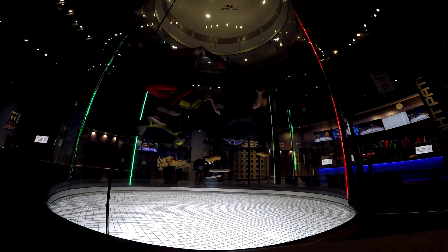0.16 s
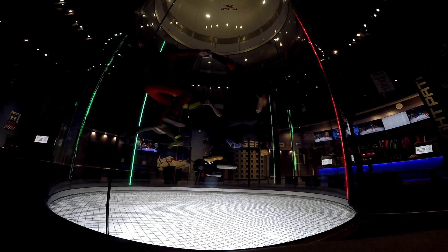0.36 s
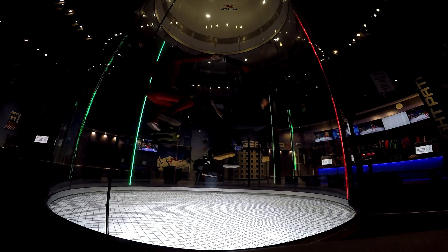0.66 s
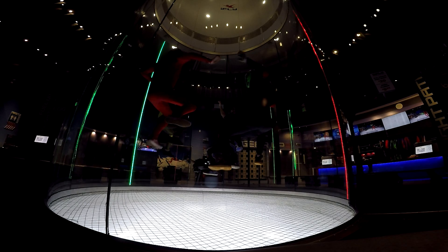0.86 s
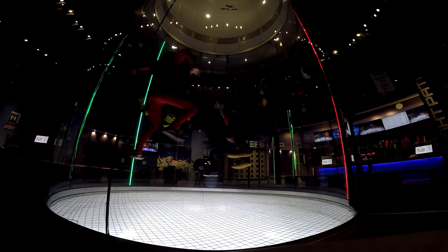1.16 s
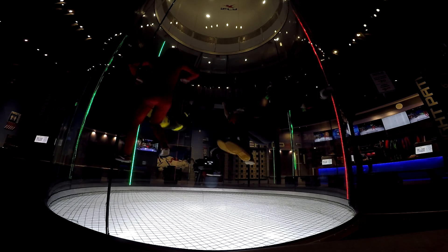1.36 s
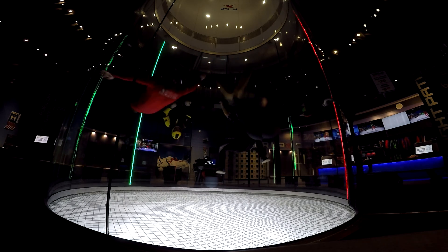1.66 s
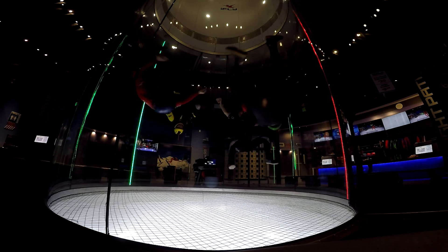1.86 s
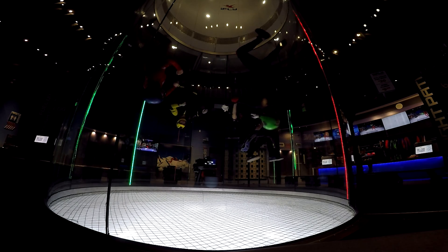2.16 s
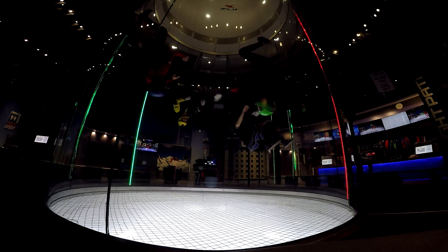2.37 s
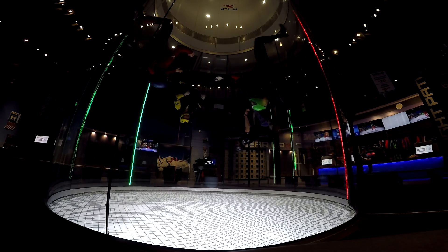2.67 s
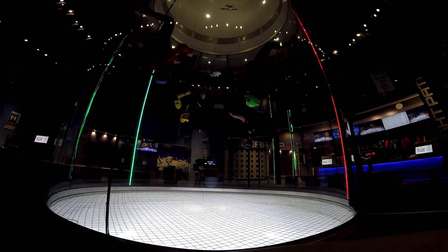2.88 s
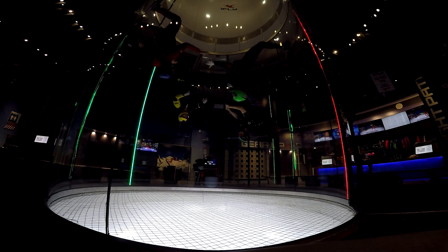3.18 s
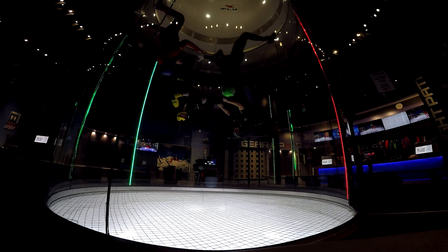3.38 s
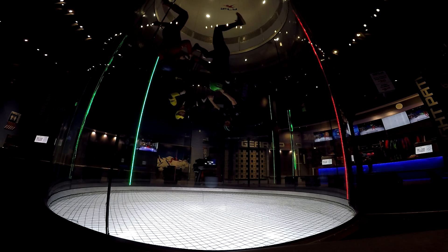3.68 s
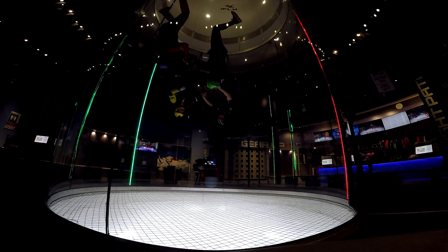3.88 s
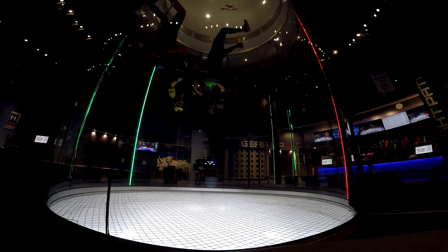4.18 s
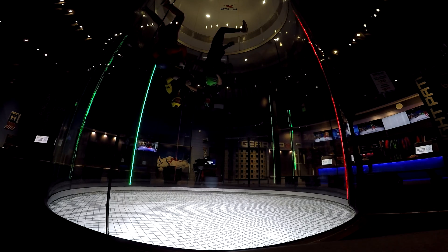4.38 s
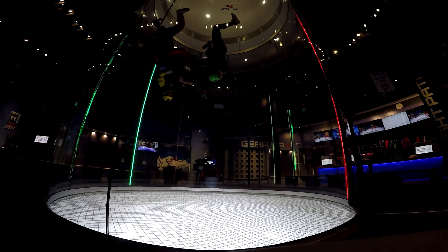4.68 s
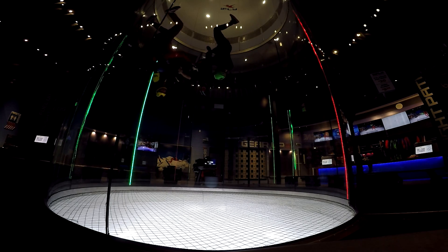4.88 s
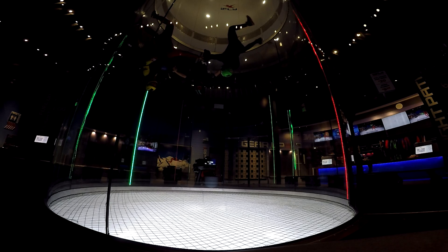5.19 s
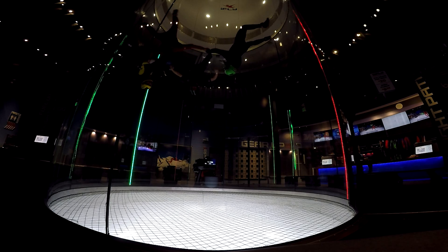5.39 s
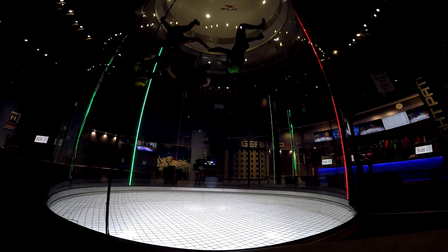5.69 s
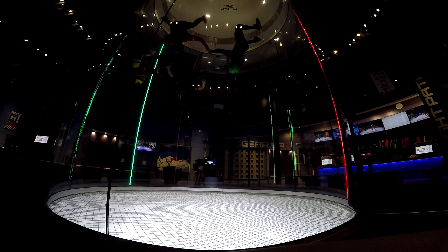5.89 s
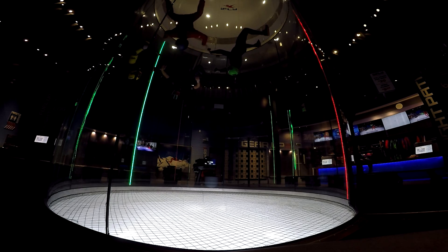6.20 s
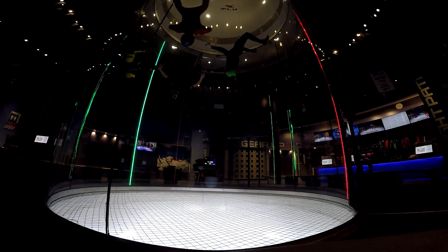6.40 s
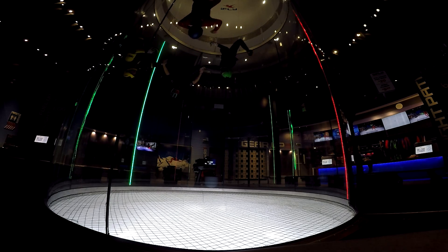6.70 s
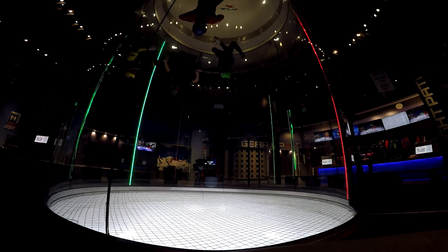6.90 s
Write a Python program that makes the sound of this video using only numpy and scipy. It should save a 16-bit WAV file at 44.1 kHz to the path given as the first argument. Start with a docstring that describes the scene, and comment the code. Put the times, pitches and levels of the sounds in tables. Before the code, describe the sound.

From the first moment to the end at about 7 seconds, a vertical wind tunnel gives a steady, loud rushing roar of air. The microphone sits inside a small housing beside the glass wall, so the roar is boxy and strongest in the low middle range. Beneath it the ducts rumble and throb deeply. Low humming tones swell and fade within the rumble, a little stronger around 1.5 seconds and again from about 5 to 7 seconds. Above the roar lie a thin, slightly gusting hiss and a faint high fan whine that wavers and flickers throughout. A very faint breathy whistle comes and goes, near 2, 4 and 5 seconds. Four tiny, dull ticks occur at roughly 2.7, 5.5, 5.8 and 7 seconds. The overall loudness stays even, with no build or let-up.

```python
"""A vertical wind tunnel at full flow, heard by a small camera shut in its housing beside the glass wall.
From the start the ducts rumble, the air column roars and hisses, and one fan tone wavers; the housing
favours a band near 700 Hz, a small cavity one near 5 kHz. Low duct tones and a faint whistle come and go.
From 2.7 s to the end the recorder ticks faintly four times. Throughout, it evens the level and rounds
the highest peaks."""
import sys
import numpy as np
from scipy import signal
from scipy.fft import rfft, irfft, next_fast_len
from scipy.io import wavfile
from scipy.ndimage import uniform_filter1d

SR = 44100
rng = np.random.default_rng(int(sys.argv[2]) if len(sys.argv) > 2 else 0)


def wrap_up_sound(samples):
    """Save the sound to the file named by the first command line argument, as 16-bit audio."""
    columns = np.atleast_2d(samples).T
    # keep every value between -1 and 1, then stretch to whole-number steps
    tamed = np.clip(columns, -1, 1)
    steps = np.round(tamed * 32767).astype(np.int16)
    wavfile.write(sys.argv[1], SR, steps)


N = 310895


def undb(db):
    """Decibels to gain."""
    return 10 ** (np.asarray(db) / 20)


def curve(points):
    """Rows of time_s, value interpolated to every sample."""
    time_s, values = np.transpose(points)
    return np.interp(np.arange(N) / SR, time_s, values)


def noise(gain):
    """Unit-rms noise with amplitude spectrum gain(hz)."""
    size = next_fast_len(N)
    hz = np.maximum(np.arange(size // 2 + 1) * SR / size, 1)
    x = irfft(rfft(rng.standard_normal(size)) * gain(hz), size)[:N]
    return x / np.std(x)


def coloured(spectrum):
    """Unit-rms noise shaped by rows of freq_hz, relative_db; silent outside them."""
    freq_hz, relative_db = np.transpose(spectrum)
    return noise(lambda hz: undb(np.interp(np.log(hz), np.log(freq_hz), relative_db, -200, -200)))


def ring(centre_hz, width_hz):
    """Unit-rms noise through one steep resonance."""
    return noise(lambda hz: 1 / (1 + (2 * (hz - centre_hz) / width_hz) ** 2))


def walk(rate_hz):
    """Random steps at rate_hz, smoothed twice; unit spread."""
    hold = int(SR / rate_hz)
    steps = np.repeat(rng.standard_normal(N // hold + 1), hold)
    smooth = uniform_filter1d(uniform_filter1d(steps, hold), hold)[:N]
    return (smooth - smooth.mean()) / smooth.std()


def sine(pitch_hz):
    """Unit-rms sine following a pitch curve."""
    return np.sqrt(2) * np.sin(2 * np.pi * np.cumsum(pitch_hz) / SR)


# Duct noise spectra: freq_hz, relative_db
THROB_SPECTRUM = [(10, -40), (16, -22.5), (22, -8), (27, -6.5), (34, 1), (42, -5.5), (50, -3.5), (58, -2.5),
                  (66, -20.5)]
RUMBLE_SPECTRUM = [(50, -18.5), (60, 1), (72, 3.5), (98, -2), (112, 0.5), (120, -7.5), (150, -9.5),
                   (165, -31)]
def duct_rumble(throb_db=-35.5, rumble_db=-33.5):
    """Airflow in the ducts: a deep throb under a steady rumble."""
    return undb(throb_db) * coloured(THROB_SPECTRUM) + undb(rumble_db) * coloured(RUMBLE_SPECTRUM)


# Roar spectrum: freq_hz, relative_db
ROAR_SPECTRUM = [(88, -30.5), (150, -5), (284, -4.5), (320, -3.5), (377, -4.5), (484, -1), (569, -5),
                 (662, 1), (746, 0.5), (850, -3), (900, -6.5), (1060, -17.5), (1310, -25), (1360, -25),
                 (1410, -21.5), (1580, -28), (2000, -34), (2600, -67), (4400, -120)]
def air_roar(level_db=-31.5):
    """The air column roars; the housing favours the band near 700 Hz."""
    return undb(level_db) * coloured(ROAR_SPECTRUM)


# Jet hiss: freq_hz, relative_db
JET_SPECTRUM = [(1900, -26.5), (2250, -7.5), (2490, -11.5), (2710, -16.5), (3390, -27.5), (3900, -15),
                (4710, -2.5), (4920, 1), (5180, -5), (5580, -16), (6390, -24.5), (6900, -34.5), (7600, -63)]
# Thin high hiss, ending above 13.5 kHz in the recorder's faint noise floor: freq_hz, relative_db
HIGH_HISS_SPECTRUM = [(6500, -18.5), (7300, 0.5), (7700, -5), (8400, -4.5), (8900, -10.5), (9400, -18.5),
                      (9900, -14), (10400, -13), (10900, -17), (11800, -14.5), (12300, -17), (13400, -22.5),
                      (13550, -32), (15900, -33)]
# Envelopes: time_s, level_db
JET_ENVELOPE = [(0.0, -53.5), (0.04, -56.5), (2.22, -56), (2.32, -54.5), (2.33, -55), (3.24, -57),
                (3.28, -55.5), (3.4, -56), (4.91, -56), (4.99, -55), (5.16, -57.5), (5.18, -56.5),
                (5.69, -54.5), (6.03, -56), (7.01, -56), (7.05, -57.5)]
HIGH_HISS_ENVELOPE = [(0.1, -83.5), (0.71, -86), (0.85, -82), (0.91, -83.5), (1.52, -84), (1.56, -83),
                      (1.79, -84), (2.1, -87), (2.18, -83), (3.38, -86), (4.1, -83.5), (4.65, -85.5),
                      (4.88, -82), (5.27, -85), (5.83, -83), (6.86, -85.5), (6.96, -82), (7.0, -86)]
WHISTLE_ENVELOPE = [(0, -100), (0.7, -102), (0.85, -93), (1.0, -96), (1.9, -102), (2.22, -89), (2.45, -97),
                    (3.1, -101), (3.8, -99), (4.05, -88), (4.3, -98), (4.75, -99.5), (4.9, -88),
                    (5.2, -96.5), (5.9, -97), (6.75, -100), (6.95, -91)]
def hiss(gust_db=0.2):
    """The jet hisses through the floor net in slight gusts; above it, thin hiss and a breathy whistle."""
    jet = undb(curve(JET_ENVELOPE)) * coloured(JET_SPECTRUM)
    high_hiss = undb(curve(HIGH_HISS_ENVELOPE)) * coloured(HIGH_HISS_SPECTRUM)
    whistle = undb(curve(WHISTLE_ENVELOPE)) * ring(centre_hz=7160, width_hz=260)
    return undb(gust_db * walk(rate_hz=4.7)) * (jet + high_hiss + whistle)


# Duct and chamber modes: pitch_hz, width_hz, level_db
STANDING_WAVES = [(33.4, 9, -45.5), (86.3, 4.4, -46), (99.4, 8.8, -42), (133.6, 3.1, -51.5),
                  (184.1, 12, -48.5), (244.6, 13, -50.5), (496.6, 5.2, -52.5), (652, 31, -51),
                  (668.7, 7.9, -50.5), (752, 46, -51.5), (821, 4.5, -53.5)]
def duct_hum():
    """Turbulence keeps standing waves humming."""
    return sum(undb(level_db) * ring(pitch_hz, width_hz)
               for pitch_hz, width_hz, level_db in STANDING_WAVES)


# Duct tones: pitch_hz
DRONE_PITCHES = 50.5, 110.5, 319, 85, 496
# One envelope per tone: time_s, level_db
DRONE_ENVELOPES = [
    [(0, -38), (0.3, -39), (0.5, -48), (1.35, -44), (1.56, -29), (1.75, -48), (2.6, -46), (2.8, -38),
     (3.1, -48), (3.55, -46), (3.75, -36), (4.0, -48), (4.85, -46), (5.15, -35), (5.4, -50), (5.7, -35),
     (6.1, -36), (6.25, -43), (6.55, -34.5), (6.75, -40), (7.05, -33)],
    [(0, -52), (1.5, -50), (1.8, -41), (2.5, -38.5), (2.75, -52), (3.1, -38.5), (3.4, -41), (3.9, -44),
     (4.1, -52), (7.05, -50)],
    [(0, -52), (0.9, -58), (1.2, -47), (1.9, -47), (2.7, -50), (3.0, -58), (4.2, -54), (4.6, -44),
     (5.1, -45), (5.7, -50), (6.3, -48), (7.05, -46)],
    [(0, -46), (1.0, -44), (2.0, -50), (3.2, -46), (3.5, -38), (4.1, -39), (4.4, -46), (4.7, -37),
     (5.0, -44), (6.0, -44), (7.05, -46)],
    [(0, -54), (0.5, -47), (1.0, -52), (1.8, -47), (2.7, -47), (3.5, -49), (4.0, -47), (5.0, -52),
     (5.7, -47), (6.6, -49), (7.05, -52)],
]
def duct_drones():
    """Low standing waves, steady enough at times to be heard as tones."""
    return sum(undb(curve(envelope)) * sine(pitch_hz + walk(rate_hz=4))
               for pitch_hz, envelope in zip(DRONE_PITCHES, DRONE_ENVELOPES))


# Fan tone envelope: time_s, level_db
WHINE_ENVELOPE = [(0.0, -57), (0.06, -64), (0.12, -57), (0.22, -61), (0.36, -58), (0.46, -66), (0.62, -61),
                  (0.8, -58), (0.92, -61), (1.0, -69), (1.1, -60), (1.25, -66), (1.42, -69), (1.52, -58),
                  (1.65, -62), (1.95, -61), (2.25, -63), (2.35, -59), (2.55, -60), (2.75, -65), (2.94, -59),
                  (3.05, -65), (3.2, -61), (3.28, -64), (3.4, -57), (3.54, -56), (3.6, -66), (3.67, -56),
                  (3.76, -56), (3.83, -64), (4.0, -62), (4.25, -63), (4.46, -58), (4.55, -64), (4.68, -58),
                  (4.82, -59), (4.9, -68), (5.2, -63), (5.38, -60), (5.55, -66), (5.68, -58), (5.78, -68),
                  (5.9, -60), (6.0, -67), (6.25, -60), (6.4, -67), (6.5, -57), (6.62, -63), (6.75, -60),
                  (6.86, -65), (6.95, -57), (7.05, -59)]
def fan_whine(pitch_hz=1388, wander_hz=2.4, flicker_db=.7, noise_share=.08):
    """A blade tone blurred by turbulent inflow: a wandering sine plus a narrow noise band."""
    tone = sine(pitch_hz + wander_hz * walk(rate_hz=6))
    level_db = curve(WHINE_ENVELOPE) + flicker_db * walk(rate_hz=18)
    blur = ring(pitch_hz, width_hz=16)
    return undb(level_db) * (np.sqrt(1 - noise_share) * tone + np.sqrt(noise_share) * blur)


# Dents before the high-pass: start_s, peak_db, length_ms
TICK_DENTS = [(2.7044, -42.5, .38), (5.5098, -29.5, .54), (5.8335, -34, .42), (7.0313, -39, .4)]
def recorder_ticks(highpass_hz=1200):
    """Dull ticks, as of peaks at the recorder's limit: short pressure dents with the bass removed."""
    time_s, dents = np.arange(N) / SR, np.zeros(N)
    for start_s, peak_db, length_ms in TICK_DENTS:
        position = 2000 * (time_s - start_s) / length_ms - 1  # -1 to 1 across the dent
        dents -= undb(peak_db) * np.maximum(1 - position ** 2, 0) ** 2
    return signal.sosfilt(signal.butter(2, highpass_hz, "high", fs=SR, output="sos"), dents)


def housing_notch(x, centre_hz=2072, width_hz=100, gain_db=-12):
    """Two paths through the shell cancel in one narrow band."""
    b, a = signal.iirpeak(centre_hz, centre_hz / width_hz, SR)
    return x - (1 - undb(gain_db)) * signal.filtfilt(b, a, x)


def scene():
    """All sources at one microphone inside the housing."""
    continuous = duct_rumble() + air_roar() + hiss() + duct_hum() + duct_drones() + fan_whine()
    return (housing_notch(continuous) + recorder_ticks())[None]


def record(dry, window_s=0.2, squeeze=0.45, ceiling=.158, knee=8, fade_s=.004, lowpass_hz=15750):
    """Gain control leans against short swells; peaks are rounded, the ends faded, the top cut."""
    window = int(window_s * SR)
    power = uniform_filter1d(uniform_filter1d(dry ** 2, window), window)
    even = dry * (np.mean(power) / power) ** (squeeze / 2)
    rounded = even / (1 + np.abs(even / ceiling) ** knee) ** (1 / knee)
    edge_s = np.minimum(np.arange(N), np.arange(N)[::-1]) / SR
    fade = np.sin(np.pi / 2 * np.minimum(edge_s / fade_s, 1)) ** 2
    lowpass = signal.ellip(8, .1, 30, lowpass_hz, fs=SR, output="sos")
    return signal.sosfiltfilt(lowpass, fade * rounded)


dry = scene()
out = record(dry)
wrap_up_sound(out)
```